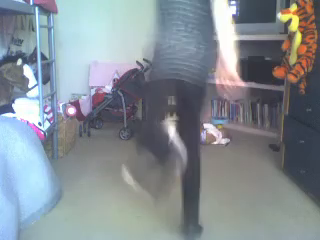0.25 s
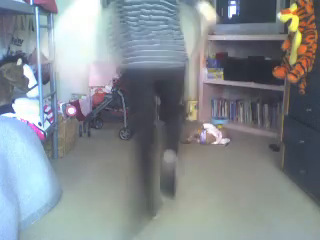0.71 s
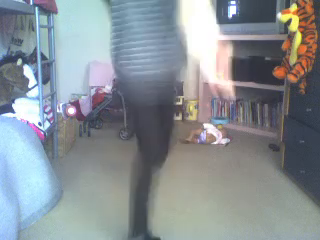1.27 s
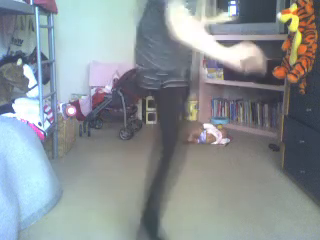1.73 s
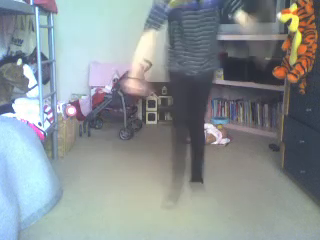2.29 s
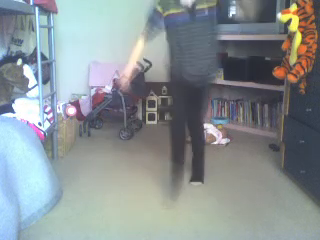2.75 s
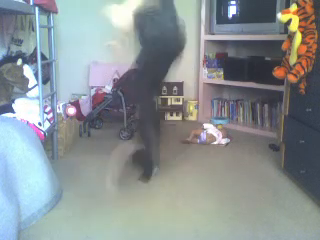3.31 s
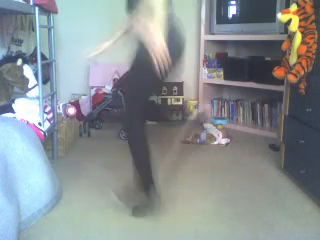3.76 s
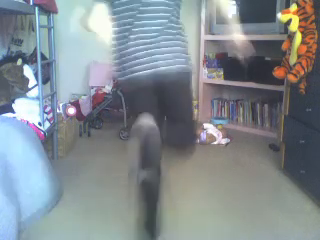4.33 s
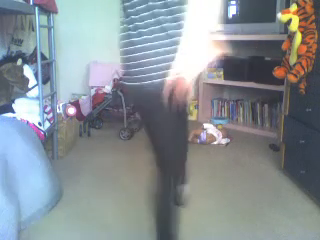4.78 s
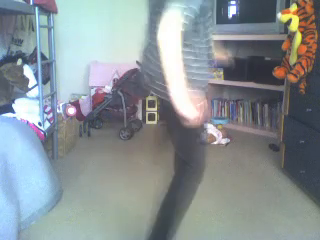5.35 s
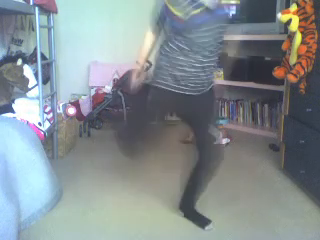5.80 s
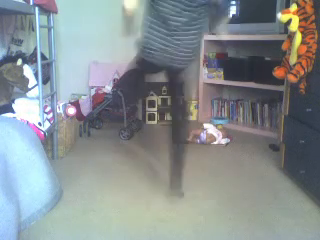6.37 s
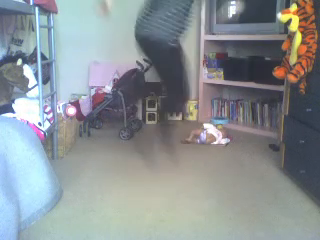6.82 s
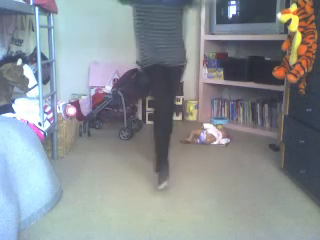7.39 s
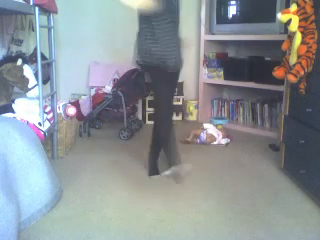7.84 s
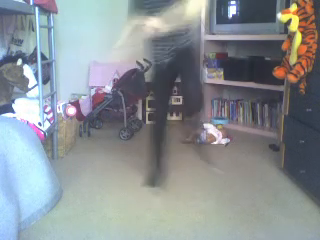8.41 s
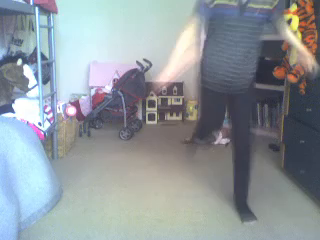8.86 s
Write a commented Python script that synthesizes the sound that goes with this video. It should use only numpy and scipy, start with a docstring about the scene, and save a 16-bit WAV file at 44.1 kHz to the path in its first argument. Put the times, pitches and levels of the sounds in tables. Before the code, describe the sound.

Feet in socks thump and scuff on a carpeted wooden floor, the hardest stomps crackling, over a faint hum and hiss.

```python
"""Dull thumps and soft scuffs: someone in socks dances and stomps on a carpeted wooden bedroom floor.
Each step sways the floor beams, thuds in the boards and booms in the small room; socks rub the carpet.
The hardest stomps crackle: they overload the converter that turns sound into numbers in a nearby webcam.
A faint hum and hiss go on throughout."""
import sys
import numpy as np
from scipy.fft import rfft, irfft, next_fast_len
from scipy.io import wavfile
from scipy.ndimage import uniform_filter1d, map_coordinates

SR = 44100
rng = np.random.default_rng(int(sys.argv[2]) if len(sys.argv) > 2 else 0)


def unload_wav(signal):
    """Save mono or channel-first audio to the path in sys.argv[1] as 16-bit WAV at rate SR, clipped to [-1, 1]."""
    wavfile.write(
        sys.argv[1],
        SR,
        np.round(np.clip(np.atleast_2d(signal).T, -1, 1) * 32767).astype(np.int16),
    )


N = 401751


def amp(db):
    """Turn decibels into a number to multiply a sound by."""
    return 10 ** (np.asarray(db) / 20)


def unit(x):
    """Scale a sound so that its average size (rms) is 1."""
    return x / np.sqrt(np.mean(x ** 2) + 1e-20)


def wobble(rate, n=N):
    """A smooth random curve, n samples long, through rate random values a second."""
    return map_coordinates(rng.standard_normal(int(n * rate / SR) + 4), [np.arange(n) * rate / SR])


def coloured(x, points):
    """Make some pitches louder and others softer, following points of (pitch [Hz], level [dB])."""
    size = next_fast_len(len(x) + 8192)
    hz, db = np.transpose(points)
    gain = amp(np.interp(np.log(np.fft.rfftfreq(size, 1 / SR) + 1), np.log(hz), db))
    return irfft(rfft(x, size) * gain, size)[:len(x)]


def noise(points, n):
    """Make n samples of noise with the given tone colour and an average size of 1."""
    return unit(coloured(rng.standard_normal(n), points))


def add(track, start, x):
    """Mix x into the track at a start time in seconds."""
    i = max(round(start * SR), 0)
    track[i:i + len(x)] += x[:max(len(track) - i, 0)]


def swell(t, rise):
    """A soft start from 0 to 1, mostly done after rise seconds."""
    return 1 - np.exp(-(t / rise) ** 2)


def hiss_and_hum():
    """A dull hiss and a few slightly unsteady tones, like those of a computer fan."""
    # tone colour of the hiss: (pitch [Hz], relative level [dB])
    hiss_colour = [(190, -22.5), (330, -2), (429, -7.5), (521, -2), (564, -8), (586, 0.5), (634, -7.5),
                   (695, -3), (927, -4.5), (1000, -2.5), (1270, -5.5), (1540, -6.5), (4010, -15),
                   (5270, -22), (7500, -58.5), (9750, -87), (16500, -120)]
    # slow drift of the hiss: (time [s], relative level [dB])
    hiss_drift = [(0.0, -46.5), (0.63, -44.5), (2.92, -44.5), (3.2, -42.5), (5.35, -46), (5.76, -44),
                  (7.15, -44.5), (7.48, -46.5), (8.22, -46), (9.11, -42.5)]
    # tones of the hum: (pitch [Hz], level [dB])
    fan_tones = [(236.9, -63.5), (300, -63.5), (527.6, -60), (602.9, -60.5), (979.6, -54), (1206, -59),
                 (1507, -67), (1658, -63.5), (1884, -74.5)]
    t = np.arange(N) / SR
    hiss_db = np.interp(t, *np.transpose(hiss_drift)) + .5 + .3 * wobble(9)
    hiss = amp(hiss_db) * noise(hiss_colour, N)
    hum = np.zeros(N)
    for hz, db in fan_tones:
        peak = np.sqrt(2) * amp(db + .65 * wobble(4))
        hum += peak * np.sin(2 * np.pi * hz * t + .7 * wobble(9))
    return hiss + hum


def touches():
    """The ball of the foot lands, then the heel; list both as (time [s], force [dB], hardness [dB])."""
    # the dance steps: (time [s], force [dB], hardness [dB], heel delay [s], heel force [dB])
    steps = [(.13, -32, -10, 0.055, -33.5), (.172, -29, -5, 0.15, -30.5), (.534, -23, -1.5, .1, -21),
             (.594, -21.5, -2, .14, -26.5), (.93, -30.5, -3, 0.16, -35.5), (1.351, -30, -6, 0.14, -34),
             (1.663, -27, -7, 0.19, -33), (2.083, -20.5, -7, 0.11, -31), (2.155, -19.5, -1, 0.15, -35),
             (2.523, -21.5, -10, .061, -30), (2.949, -19.5, -5, .13, -37), (3.245, -29, -11, .12, -48),
             (3.655, -25, -2, 0.14, -27), (3.721, -23, -10, 0.17, -29.5), (4.07, -39.5, 3.5, .169, -35),
             (4.521, -35.5, -7, 0.095, -46), (4.87, -30, -12, 0.19, -42.5), (5.219, -28.5, 3, 0.2, -41),
             (5.629, -19.5, 2, 0.1, -19.5), (5.67, -15.5, 1, .14, -28), (5.89, -31, 5, .24, -46),
             (6.485, -18, 6, 0.2, -47), (6.67, -36.5, -8, .12, -55), (6.925, -24.5, -11, 0.12, -27.5),
             (6.975, -17.5, 3, 0.12, -31), (7.055, -23.5, -8.5, 0.11, -42), (7.38, -37, -8, 0.11, -53),
             (7.649, -37, -15, 0.12, -52), (7.761, -41, -12.5, 0.23, -44), (8.1, -31, -6, 0.11, -56.5),
             (8.489, -27.5, -10, .12, -26), (8.805, -18.5, -2.5, 0.063, -24)]
    early_s = .008  # each touch sounds a moment before its listed time
    heel_hardness_db = 5.5  # the bony heel knocks more than the ball
    balls = [(time - early_s, force, hardness) for time, force, hardness, _, _ in steps]
    heels = [(time + delay - early_s, force, heel_hardness_db) for time, _, _, delay, force in steps]
    return balls + heels


def strength(blow, usual_db, per_force, per_hardness):
    """How strong one part of a step sounds, for a blow of (force [dB], hardness [dB])."""
    force_db, hardness_db = blow
    ordinary_force_db = -28.5
    return amp(usual_db + per_force * (force_db - ordinary_force_db) + per_hardness * hardness_db)


def ring(tones, t, rise, scatter_db):
    """Struck tones die away, 60 dB in their fade time; each blow hits a new spot, so their mix varies."""
    hz, db, fade = np.transpose(tones)[:, :, None]
    size, detune, side = rng.standard_normal((3, len(tones), 1))
    waves = np.sign(side) * np.sin(2 * np.pi * hz * (1 + .033 * detune) * t)
    levels = amp(db + scatter_db * size - 60 * t / fade)
    ringing = swell(t, rise) * np.sum(levels * waves, axis=0)
    loudest = np.sqrt(uniform_filter1d(ringing ** 2, size=SR // 25).max())  # over 40 ms
    return ringing / loudest


def footfalls():
    """Steps over a constant low rumble; carpet softens each blow, so floor and room ring only low."""
    # the next four are the tones a step sets ringing: (pitch [Hz], relative level [dB], fade time [s])
    beam_tones = [(9.9, -0.5, .8), (16.045, 0.5, 0.84), (25.2, -8.5, 0.36), (33.2, -13.5, .3),
                  (40.95, -6, 0.45)]  # slow sway of the beams under the floor
    board_tones = [(46.5, -4, 0.18), (53.3, -8, 0.2), (62.57, 0.5, 0.34), (79.44, -0.5, 0.38),
                   (88.5, -3, .22), (97.3, -2, 0.31), (113, -3.5, .2), (124.8, -7.5, .2)]  # thud of the floorboards
    room_tones = [(131, -4.5, 0.063), (141.5, -6.5, 0.19), (157.4, -2, 0.4), (172.7, -5.5, 0.44),
                  (203.7, -7.5, .2)]  # boom of the air in the room
    knock_tones = [(210.1, -5.5, 0.17), (230, 0, 0.16), (243.6, -3, 0.27), (266.5, -4, 0.32),
                   (291.5, -10.5, 0.22), (349, -14.5, 0.18), (387.7, -18, 0.22)]  # hollow knock, strongest under a hard blow
    # dull slap of a sole on carpet: (pitch [Hz], relative level [dB])
    slap_colour = [(25, -15), (50, -8.5), (110, 5), (190, -7), (280, -17.5), (450, -24), (900, -35),
                   (2000, -52), (5000, -90)]
    # tone colour of the rumble: (pitch [Hz], relative level [dB])
    rumble_colour = [(8, -1.5), (13, 14), (25, -9), (36, -7.5), (48, -1.5), (62, -4.5), (80, -11),
                     (110, -23), (160, -17), (240, -21), (330, -30), (500, -68), (3000, -120)]
    sway, thuds = np.zeros(N), np.zeros(N)
    t = np.arange(int(.7 * SR)) / SR
    for time, force, hardness in touches():
        blow = (force, hardness)
        knock_rise = .0082 * 2 ** (-hardness / 22)  # a harder blow starts more sharply
        beams = ring(beam_tones, t, rise=.019, scatter_db=3)
        boards = ring(board_tones, t, rise=.015, scatter_db=3)
        boom = ring(room_tones, t, rise=.014, scatter_db=.5)
        knock = ring(knock_tones, t, rise=knock_rise, scatter_db=5.5)
        slap = amp(-60 * t / .3) * swell(t, rise=.0075) * noise(slap_colour, len(t))
        add(sway, time, beams * strength(blow, usual_db=-16.5, per_force=.35, per_hardness=-.35))
        add(thuds, time, boards * strength(blow, usual_db=-30.5, per_force=.8, per_hardness=-.046))
        add(thuds, time, boom * strength(blow, usual_db=-39.5, per_force=1.15, per_hardness=-.16))
        add(thuds, time, knock * strength(blow, usual_db=-40, per_force=.7, per_hardness=1))
        add(thuds, time, slap * strength(blow, usual_db=-35.5, per_force=1.1, per_hardness=-.1))
    rumble = amp(-31.5 + 2.4 * wobble(6.4)) * noise(rumble_colour, N)
    deep = sway + rumble
    microphone_limit = .22  # the deepest pressure swings flatten here
    flattened = deep / (1 + (deep / microphone_limit) ** 4) ** (1 / 4)
    return flattened + thuds


def rub(centre_hz, octaves, rise, fade):
    """One short, grainy brush of cloth over carpet fibres: noise gathered around one pitch."""
    # tone colour of the carpet fibres: (pitch [Hz], relative level [dB])
    carpet_colour = [(150, -12.5), (400, 8), (2600, 2), (4000, -5.5), (5500, -9.5), (6300, -26),
                     (6900, -73), (7500, -120)]
    t = np.arange(SR // 3) / SR
    band = [(centre_hz * 2 ** (k * octaves), -4 * k * k) for k in range(-4, 5)]
    grainy = amp(3.1 * wobble(180, len(t))) * noise(band, len(t))
    return amp(-60 * t / fade) * swell(t, rise) * unit(coloured(grainy, carpet_colour))


def sock_scuffs():
    """Every touch of a foot brushes the carpet; there are also soft scuffs and one short, dry tick."""
    # a dry tick, then soft scuffs:
    # (time [s], level [dB], rise time [s], fade time [s], pitch [Hz], width [octaves])
    tick_and_scuffs = [(.1825, -25, .0005, .015, 2600, 1.5), (.533, -27, 0.0033, 0.13, 1090, .7),
                       (.85, -32.5, 0.014, 0.18, 1970, 1), (1.652, -36, 0.005, .1, 603, .55),
                       (2.151, -31.5, .002, 0.099, 760, .42), (2.5, -35, .03, .28, 1100, 1),
                       (3.656, -27.5, 0.0016, 0.16, 1010, 0.8), (3.685, -33.5, .007, .25, 1100, .8),
                       (4.048, -33.5, 0.0042, 0.081, 1000, .4), (4.38, -39.5, .011, 0.234, 2300, .9),
                       (5.205, -37.5, .004, 0.094, 550, 0.66), (6.135, -39.5, .011, 0.39, 1540, 0.16),
                       (6.477, -37, .004, .1, 500, .75), (8.02, -40, .008, .15, 800, .6),
                       (8.61, -36.5, .015, 0.25, 750, .8), (8.755, -37.5, 0.0056, .15, 2680, 0.54),
                       (8.799, -30.5, .001, .06, 615, .62)]
    scuffs = np.zeros(N)
    for time, *blow in touches():
        brush = rub(centre_hz=590, octaves=.55, rise=.012, fade=.1)
        add(scuffs, time, brush * strength(blow, usual_db=-42.5, per_force=.5, per_hardness=.25))
    for time, db, rise, fade, centre_hz, octaves in tick_and_scuffs:
        add(scuffs, time, amp(db) * rub(centre_hz, octaves, rise, fade))
    return scuffs


def overload_crackle(pressure):
    """At the listed times the overloaded converter flips to its opposite limit; each flip is a click."""
    # overloads, from lone ticks to runs of flips: (time [s], length [s], relative jump size [dB])
    overloads = [(0.6017, 0.00068, 0), (.6023, .0035, -2.2), (0.634, 0.0012, -13), (0.6389, 0, -10),
                 (.6408, 0.0024, -1), (.658, 0, -24), (2.9726, 0, -10), (2.9788, .0001, 1.5),
                 (2.9918, 0, 1.5), (3.002, 0, -6), (5.678, 0.00024, -5.5), (5.6831, 0.0061, 0),
                 (5.6915, 0.00097, -4), (5.7116, 0, -1), (5.7175, .0001, 2.5), (5.7358, 0.0006, -1.5),
                 (5.7424, 0.0076, 0.96), (6.9668, 0.00035, -14), (6.9725, 0, 4), (6.978, 0.00062, -1.5),
                 (7.0008, 0.003, 0), (7.018, 0, 1.5), (7.0291, 0, 3), (7.0422, 0, -13.5)]
    # tone colour of the clicks: (pitch [Hz], relative level [dB])
    click_colour = [(100, -1), (400, -4), (700, -0.5), (1200, 0), (1700, -4), (3200, 0), (5200, -4.5),
                    (8000, 1), (10600, -3), (11300, -18.5), (13000, -24.5), (15800, -24.5), (16800, -39.5)]
    # tone colour of a brief, faint hiss around each click: (pitch [Hz], relative level [dB])
    hiss_colour = [(300, -9.5), (2000, 0), (4500, 0), (6200, -3), (8000, -1.5), (10700, -0.5), (11200, -14),
                   (12000, -19), (12600, -46.5), (16000, -68)]
    held_samples, flip_share, rebound = 3, .52, .071
    flips = np.zeros(N // 2 + 1)  # the converter runs at half the sample rate
    hiss = np.zeros(N)
    hiss_shape = np.hanning(int(.021 * SR))
    for time, length, jump_db in overloads:
        n = 1 + round(abs(length) * SR / 2)
        held = np.arange(n) < held_samples  # a run sticks at first, then chatters
        chatter = rng.permutation(n) / n < flip_share
        run = np.convolve(held | chatter, [-rebound, 1, -rebound])  # a flip's neighbours spring back
        opposite = -np.sign(pressure[round(time * SR)])
        add(flips, time / 2, opposite * amp(jump_db) * run)
        hiss_db = -32 + .73 * jump_db + 8 * np.log10(n)  # louder around bigger, longer crackles
        burst = amp(hiss_db) * hiss_shape * noise(hiss_colour, len(hiss_shape))
        add(hiss, time + (n - len(burst) / 2) / SR, burst)  # centred on the run
    clicks = np.zeros(N)
    clicks[::2] = 2 * (flips - uniform_filter1d(flips, size=71))  # keep the wave centred on zero
    return coloured(clicks, click_colour) + hiss


def scene():
    """Mix steps, scuffs, crackle, hiss and hum into one channel."""
    feet = footfalls()
    return (feet + sock_scuffs() + overload_crackle(feet) + hiss_and_hum())[None]


def record(dry):
    """The webcam cuts off swings that are too big and drops the highest treble."""
    limit, edge_s, top_hz = .85, .006, 16400
    t = np.arange(N) / SR
    # the sound fades in and out over a few milliseconds, so its ends do not click
    faded = np.clip(dry, -limit, limit) * swell(t, edge_s) * swell(t[::-1], edge_s)
    size = next_fast_len(N + 8192)
    treble_cut = 1 / (1 + (np.fft.rfftfreq(size, 1 / SR) / top_hz) ** 120)
    return irfft(rfft(faded, size) * treble_cut, size)[:, :N]


dry = scene()
out = record(dry)
unload_wav(out)
```